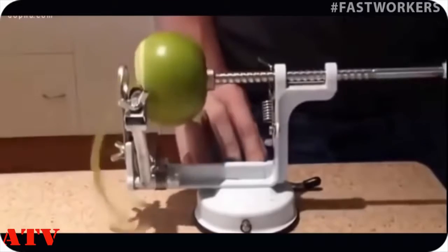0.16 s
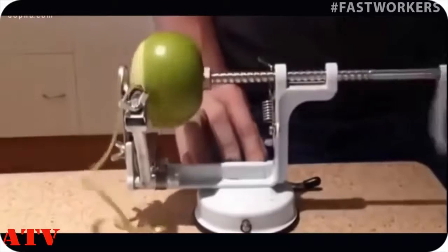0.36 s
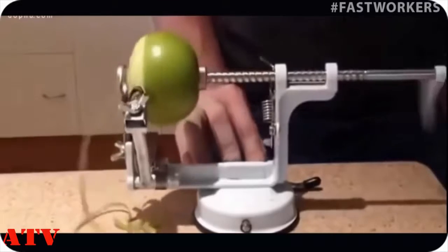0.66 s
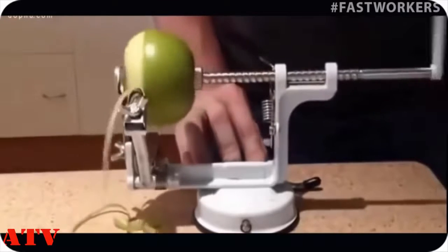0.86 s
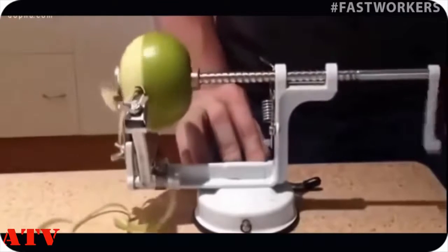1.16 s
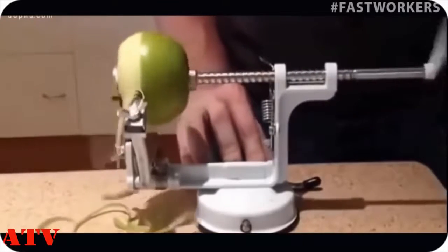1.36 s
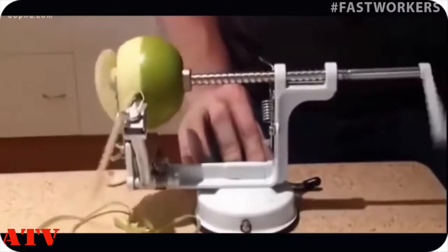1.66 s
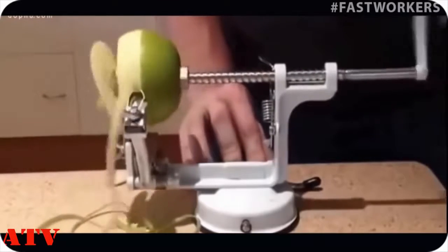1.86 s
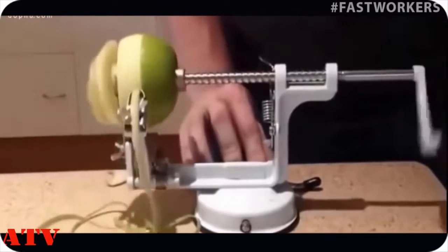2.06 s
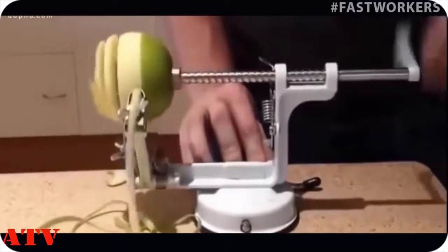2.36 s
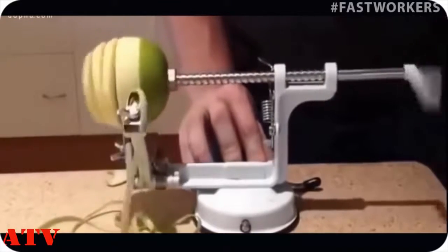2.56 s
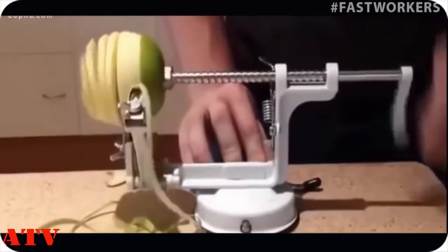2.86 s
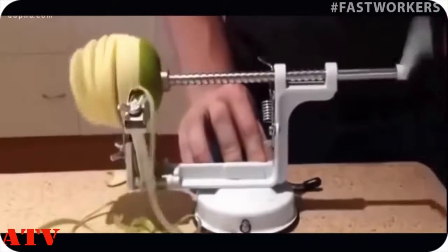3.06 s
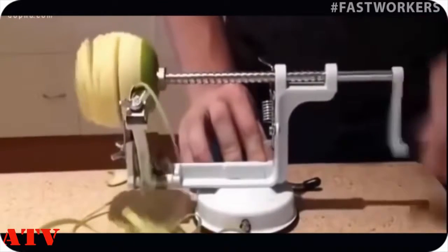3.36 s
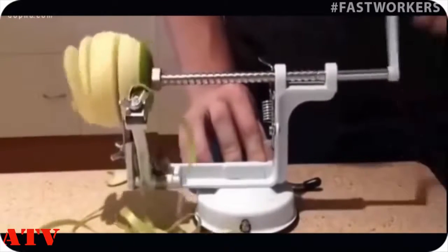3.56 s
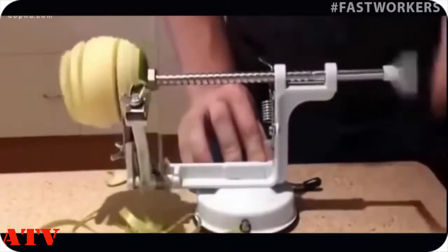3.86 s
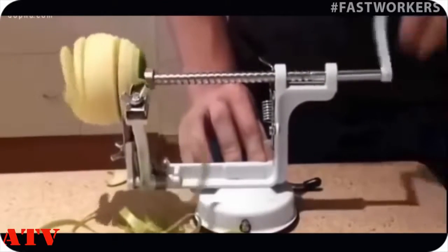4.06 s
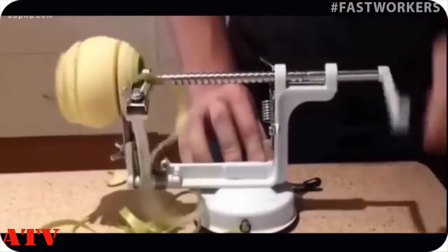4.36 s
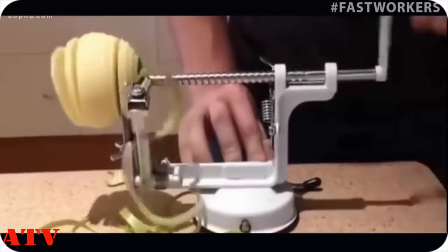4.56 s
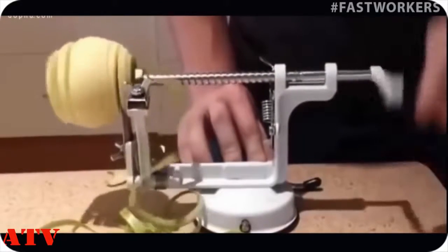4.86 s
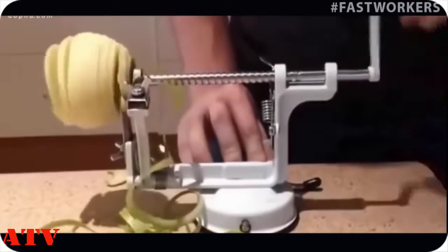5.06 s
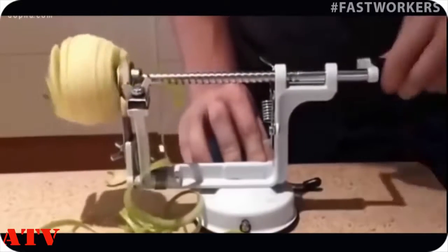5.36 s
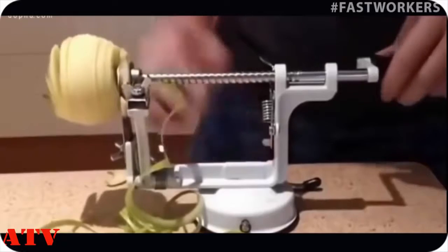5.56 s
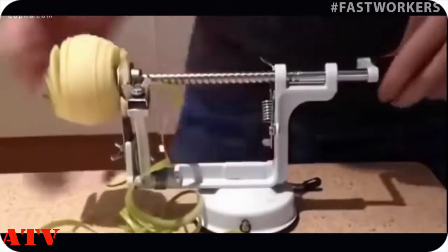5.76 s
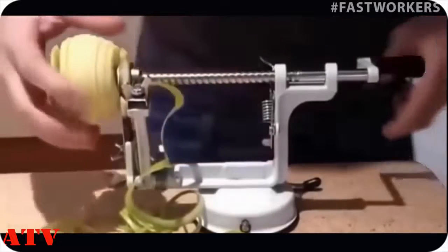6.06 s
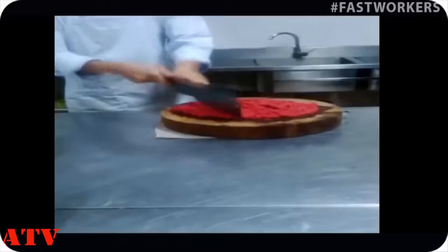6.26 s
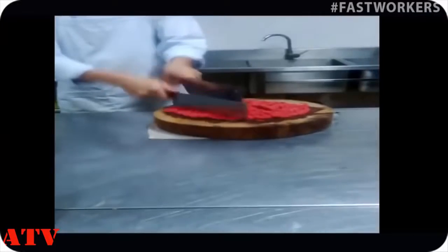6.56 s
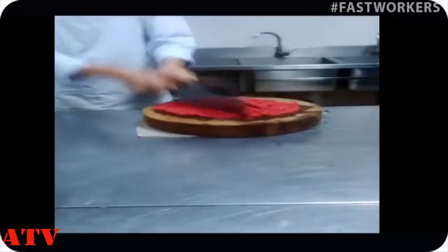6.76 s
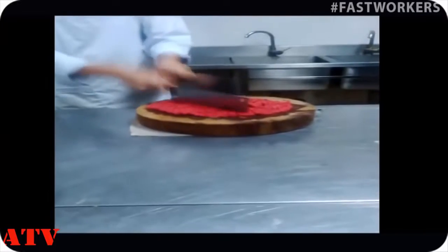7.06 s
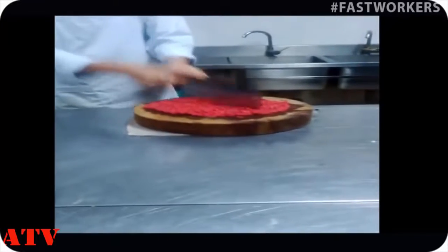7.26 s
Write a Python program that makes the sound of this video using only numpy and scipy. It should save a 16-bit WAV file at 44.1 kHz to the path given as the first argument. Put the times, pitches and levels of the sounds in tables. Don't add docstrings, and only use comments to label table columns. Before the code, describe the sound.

Crisp, juicy apple peeling with creaks and knocks gives way to fast, echoing cleaver blows on a thick board in a hard-walled kitchen.

```python
import sys
import numpy as np
from scipy import signal
from scipy.fft import rfft, irfft, next_fast_len
from scipy.io import wavfile

SR = 44100
rng = np.random.default_rng(int(sys.argv[2]) if len(sys.argv) > 2 else 0)


def ratio(d):
    e = np.asarray(d, float) / 20
    return 10 ** e


def materialize(psi):
    bounded = np.clip(np.atleast_2d(psi).T, -1, 1)
    quanta = np.round(bounded * 32767).astype(np.int16)
    wavfile.write(sys.argv[1], SR, quanta)


N = 327486
CRANK_STOP_S = 5.21
# start_s, crack_peak_db, blade_ring_hz, board_db, push_db
BLOWS = [(6.3505, -54, 3140, -33, -71), (6.4343, -36.5, 3420, -31.5, -62), (6.5217, -44, 2770, -37, -29),
         (6.591, -31.5, 3400, -24.5, -39), (6.6949, -28, 3390, -20, -21), (6.769, -28, 3100, -17, -45),
         (6.872, -20.5, 4440, -10.5, -14), (6.9353, -25.5, 3300, -9.5, -34), (7.042, -23, 4800, -1.5, -3.5),
         (7.1154, -17.5, 4970, -1, -17), (7.213, -20, 5000, -3, -11), (7.2772, -23, 3350, -0.5, -23),
         (7.3843, -16, 4850, -3, -20)]


def peeler():
    # pitch_hz, level_db
    hiss_colour = [(3500, -21.5), (4500, -7.5), (5700, -3), (6300, 1), (6900, 0.5), (7500, 0), (8200, -3.5),
                   (10000, -15.5), (12000, -18)]
    scrape_colour = [(500, -9.5), (750, -4.5), (1000, -6.5), (1350, -2.5), (1800, -4), (2500, -2),
                     (4000, 2.5), (5000, 1.5), (7000, -21)]
    sizzle_colour = [(6500, -19), (9000, 6.5), (10500, 6.5), (12500, 2.5), (14500, -9)]
    bite = drift(6.4)

    hiss = two_ports(grains(9000., 2.3), hiss_colour, diffuse=0.67, left_db=-4.5)
    hiss = hiss * cutting(-32.5, share=1.73, turn_db=0.84, flick_db=1.5)
    hiss = hiss * ratio(2.0 + 1.0 * bite + 0.46 * drift(34.0))

    scrape = two_ports(grains(5000., 3.0), scrape_colour, diffuse=.7, left_db=-1.2)
    scrape = scrape * cutting(-35.5, share=1.62, turn_db=0.3, flick_db=-10.5)
    scrape = scrape * ratio(1.5 + .4 * bite + .6 * drift(15.))

    sizzle = two_ports(grains(12000.0, 3.0), sizzle_colour, diffuse=0.99, left_db=-2.0)
    sizzle = sizzle * cutting(-37, share=1.68, turn_db=0.5, flick_db=-10)
    sizzle = sizzle * ratio(0.34 * bite + 0.29 * drift(30.))

    blade_hz, width_hz = 6790, 480
    sung = resonate(rng.standard_normal((2, N)), blade_hz, width_hz)
    sung = rms_one(resonate(sung, blade_hz, 2 * width_hz))
    song = sung * ratio(np.array([[-2.5], [1.5]]) + 2.6 * drift(14.5))
    song = song * cutting(-40.5, share=0.4, turn_db=-0.5, flick_db=-35) * (np.arange(N) / SR < CRANK_STOP_S)

    tear = rms_one(resonate(rng.standard_normal((2, N)), 8300, 2600))
    tear = tear * ratio(np.array([[-2.0], [1.5]])) * cutting(-49.5, share=8.5, turn_db=-2.5, flick_db=7)
    return hiss + scrape + sizzle + song + tear


def cutting(level_db, share, turn_db, flick_db):
    # start_s, level_db
    bite_curve = [(0, -37), (.3, -36), (1.0, -34.5), (1.17, -36.5), (1.3, -34.5), (1.56, -34), (1.66, -33),
                  (1.97, -30.5), (2.04, -33), (2.12, -30.5), (2.3, -30), (2.55, -32), (2.7, -30.5),
                  (2.9, -31.5), (3.4, -32), (3.65, -31), (4.5, -32), (5.05, -33.5), (5.17, -34.5),
                  (5.6, -43.5), (5.95, -57)]
    # start_s, peak_db
    flicks = [
        (5.268, -35.5),
        (5.47, -45),
    ]
    mean_bite_db = -32
    turns_per_s, downstroke_s = 2.12, 2.167
    rise_s, fall_s = 0.038, 0.048

    t = np.arange(N) / SR
    stroke = np.cos(2 * np.pi * turns_per_s * (t - downstroke_s)) * (t < CRANK_STOP_S)
    steady = ratio(level_db + share * (in_time(bite_curve) - mean_bite_db) + turn_db * stroke)
    flare = 0
    for s, peak_db in flicks:
        width_s = np.where(t < s, rise_s, fall_s)
        flare = flare + ratio(peak_db + flick_db) * np.exp(-.5 * ((t - s) / width_s) ** 2)
    return steady + flare


def snaps():
    # start_s, peak_db
    ticks = [
        (0.9665, -21),
        (1.2185, -24),
        (1.599, -22),
        (1.804, -19),
        (2.1223, -14),
        (2.299, -21),
        (2.311, -23),
        (2.509, -21.5),
        (2.7945, -24),
        (3.4765, -30),
    ]
    s, peak_db = np.transpose(ticks)
    trail = die_away(clicks_at(s, peak_db - 6.5), 0.0018)
    return rms_one(resonate(rng.standard_normal(N), 6900, 3000.)) * trail * ratio(np.array([[-2.5], [1.5]]))


def frame():
    # pitch_hz, width_hz, level_db
    frame_modes = [(123, 32, -12), (226, 19.5, 3), (291, 42, 1.5), (345, 35, -23), (416.4, 20, -2.5),
                   (501, 26, -1), (637, 16.4, -3), (656, 36, -12.5)]
    # start_s, peak_db, brightness_db, thud_hz
    knock_events = [(0.068, -30, -23, 226), (0.25, -30, -3.5, 138), (0.808, -23, -11, 267),
                    (1.219, -15.5, -5, 240), (1.244, -32, -18, 300), (1.276, -21, -13.5, 240),
                    (1.589, -27.5, -1, 210), (1.698, -26.5, -0.5, 130), (1.93, -32, 0.5, 286),
                    (2.16, -33.5, -23, 417), (2.3, -41, -15, 506), (2.458, -30, -29, 345),
                    (2.578, -20.5, -23, 161), (2.739, -27, 0.5, 256), (3.412, -37, 4, 221),
                    (3.57, -21.5, -8, 313), (3.849, -27, -23, 223), (4.078, -30, -37, 214),
                    (4.166, -35, -26, 226), (4.39, -25, -17, 225), (4.515, -27, -29, 226),
                    (4.66, -41, 7, 225), (4.967, -43, 4, 231), (5.16, -27, -21.5, 290)]
    rest_db = -1.5
    load = cutting(-41.5, share=0.86, turn_db=0.5, flick_db=-19)
    load = load * ratio(2.34 * drift(5.9) + rest_db * (np.arange(N) / SR > CRANK_STOP_S))
    s, peak_db, bright_db, thud_hz = np.transpose(knock_events)
    shaking, knocks = 0, 0
    for hz, width_hz, level_db in frame_modes:
        judder = rng.standard_normal(N) * ratio(2.1 * drift(7.3))
        both = judder + 0.81 * rng.standard_normal((2, N)) * np.sqrt(hz / 300)
        shaken = resonate(resonate(both, hz, 1.56 * width_hz), hz, 180.0)
        shaking = shaking + ratio(level_db) * rms_one(shaken)
        near_db = -14 * np.abs(np.log2(thud_hz / hz))
        thud = ring(clicks_at(s, peak_db + near_db - 10.0), hz, 10.0 / hz + 0.083)
        knocks = knocks + resonate(thud, hz, 160.)

    trail = die_away(clicks_at(s, peak_db + bright_db - 14), 0.047)
    rattle = rms_one(resonate(rng.standard_normal((2, N)), 700, 1000.0)) * trail
    for hz in (872, 1055, 1215, 1400):
        bright_clicks = clicks_at(s, peak_db + bright_db - 13.5 + rng.normal(0, 0.73, len(s)))
        knocks = knocks + resonate(ring(bright_clicks, hz, 0.088), hz, 900.)
    return rms_one(shaking) * load + knocks + rattle


def groans():
    # start_s, pitch_hz, level_db, length_s
    groan_events = [(0.131, 215, -41.5, 0.053), (0.183, 199, -46, 0.057), (0.261, 135, -47, 0.069),
                    (0.276, 620, -49.5, 0.044), (0.493, 207, -44, 0.078), (0.589, 226, -46, 0.042),
                    (0.885, 115, -46, 0.058), (0.949, 635, -47, 0.032), (0.975, 339, -45, 0.056),
                    (1.228, 321, -40.5, 0.03), (1.236, 224, -48.5, 0.043), (1.236, 610, -36.5, 0.031),
                    (1.283, 327, -44.5, 0.044), (1.704, 210, -41, 0.041), (1.707, 124, -40.5, 0.029),
                    (1.736, 605, -50.5, 0.05), (1.811, 316, -40.5, 0.041), (2.101, 345, -44.5, 0.061),
                    (2.174, 298, -42, 0.023), (2.188, 415, -40.5, 0.07), (2.302, 511, -45.5, 0.064),
                    (2.322, 151, -40.5, 0.029), (2.374, 236, -37, 0.036), (2.473, 345, -43.5, 0.032),
                    (2.563, 226, -38.5, 0.056), (2.618, 226, -43, 0.062), (2.74, 447, -45, 0.055),
                    (2.743, 245, -50, 0.055), (2.752, 516, -40.5, 0.027), (2.865, 730, -56, 0.041),
                    (3.422, 215.6, -38, 0.084), (3.582, 291, -40, 0.08), (3.637, 530, -46, 0.053),
                    (3.663, 614, -41.5, 0.033), (3.805, 427, -37.5, 0.019), (3.875, 226, -36.5, 0.077),
                    (4.072, 615, -43, 0.037), (4.095, 505, -44.5, 0.074), (4.185, 219, -40, 0.086),
                    (4.374, 430, -41.5, 0.03), (4.397, 231, -33.5, 0.035), (4.528, 226, -35.5, 0.028),
                    (4.531, 592, -51, 0.041), (4.667, 226, -39.5, 0.058), (4.821, 670, -43.5, 0.029),
                    (4.981, 231, -45, 0.029), (5.169, 291, -39, 0.026), (5.181, 226, -49, 0.028)]
    out = np.zeros(N)
    for s, hz, level_db, length_s in groan_events:
        at = np.arange(max(0, round((s - .15) * SR)), round((s + .25) * SR))
        late = at / SR - s
        swell = np.exp(-.5 * (late / (length_s * np.where(late < 0, .3, .45))) ** 2)
        out[at] += ratio(level_db + 4.0) * swell * np.sin(2 * np.pi * hz * late)
    return out


def cleavers():
    # pitch_hz, level_db, time_to_fade_60_db_s
    board_modes = [(820, -16.5, 0.041), (944, -5, 0.032), (954, -2, 0.043), (995, -4.5, 0.035),
                   (1069, -5.5, 0.052), (1136, -5, 0.049), (1210, -15, 0.03), (2003, -5, 0.021),
                   (2130, -9.5, 0.057), (2330, -22, 0.013), (3400, -10, .015)]
    # delay_s, level_db
    wall_echoes = [(.0088, -3), (0.0117, 2), (.0265, -10), (.042, -20), (.055, -15.5), (.071, -27)]
    upper_db = [-2, 5.5, -14, 3.5, 4, 2.5, -0.5, 4.5, -3, -8, -4, -1.5, -2]
    upper_hz, off_hand_nearer_s = 1700, .0006

    fade_db = fade_in_db()
    s, crack_db, blade_hz, board_db, push_db = np.transpose(BLOWS)
    s = s + .0012
    off_hand = np.arange(len(s)) % 2
    starts = (s * SR).astype(int)
    lift_db = np.minimum(-fade_db[starts], 34)

    t = np.arange(800) / SR
    crack = np.zeros(N)
    snap_db = board_db - crack_db - 5 * off_hand
    for at, db, weight_db, hz in zip(starts, crack_db + lift_db, snap_db, blade_hz):
        snap = ratio(weight_db + 5.5) * np.sin(2 * np.pi * 2000 * t) * np.exp(-t / .0003)
        spit = resonate(resonate(rng.standard_normal(len(t)), 3000, 3600), 3000, 7200)
        spit = spit * np.exp(-t / .0025) * ratio(8)
        blade = ratio(6) * np.sin(2 * np.pi * hz * t) * np.exp(-t / .002)
        crack[at:at + len(t)] += ratio(db) * (snap + spit + blade)
    crack = signal.sosfilt(signal.butter(2, 7800, fs=SR, output="sos"), crack)
    push = ring(clicks_at(s - .0005, push_db + lift_db + 0.5), 225, 0.012)

    strength_db = rng.normal(0, 1.5, (len(s), len(board_modes)))
    struck = s - off_hand_nearer_s * off_hand
    knock = 0
    for k, (hz, db, t60) in enumerate(board_modes):
        hit_db = board_db + lift_db + db + 3.5 + strength_db[:, k] + np.array(upper_db) * (hz > upper_hz)
        knock = knock + ring(clicks_at(struck, hit_db), hz, t60)

    direct = ratio(-17.5) * knock + ratio(-11.0) * resonate(knock, 2220, 500.)
    soft = signal.sosfilt(signal.butter(4, 2700., fs=SR, output="sos"), resonate(knock, 1550, 1250.0))
    echoed = sum(ratio(db - 7.0) * np.roll(soft, round(lag * SR)) for lag, db in wall_echoes)
    lasting = knock + ratio(2.5) * resonate(knock, 2130, 300.)
    tail = ratio(-12.5) * hard_room(lasting + ratio(-21.0) * crack)
    return ratio(fade_db) * (crack + push + direct + echoed + tail)


def thin_high_tones():
    # pitch_hz, width_hz, level_db
    tone_bands = [(11600, 140, -50), (11850, 110, -45.5), (12250, 90, -46), (12700, 100, -47),
                  (13250, 90, -51), (13900, 90, -45), (14230, 90, -46)]
    lead_s, length_s, off_hand_db = 0.015, 0.016, -16
    t, out = np.arange(N - round(1.1 * SR), N) / SR, np.zeros((2, N))
    for hz, width_hz, level_db in tone_bands:
        swell = 0
        for k, row in enumerate(BLOWS):
            strength = ratio(rng.normal(0, 3) + off_hand_db * (k % 2))
            swell = swell + strength * np.exp(-.5 * ((t - row[0] + lead_s) / length_s) ** 2)
        sung = resonate(rng.standard_normal(len(t)) + 1.3 * rng.standard_normal((2, len(t))), hz, width_hz)
        out[:, -len(t):] += ratio(level_db) * rms_one(resonate(sung, hz, 3 * width_hz)) * swell
    return out * ratio(fade_in_db())


def sucks():
    # start_s, peak_db, pitch_hz
    pulls = [(6.385, -30, 5000), (6.657, -24, 3430), (6.852, -15, 6570), (6.887, -10, 3500),
             (7.009, -15, 6430), (7.0756, -4, 5130), (7.0948, -5, 3400), (7.192, -6.5, 5060),
             (7.2594, -35, 3400), (7.3586, -5.5, 3550), (7.3763, -9, 5060)]
    out, t = np.zeros(N + SR), np.arange(1200) / SR
    for s, peak_db, hz in pulls:
        smack = rms_one(resonate(rng.standard_normal(len(t)), hz, 3600.0))
        at = round(s * SR)
        out[at:at + len(t)] += ratio(peak_db - 20.0) * smack * np.minimum(t / 0.0022, 1) * np.exp(-t / 0.028)
    return out[:N]


def squeaks():
    # start_s, level_db, pitch_hz
    squeezes = [(6.41, -51, 5000), (6.605, -46, 7500), (6.851, -32, 6720), (6.967, -29.5, 3300),
                (7.012, -33, 6500), (7.093, -26, 4200), (7.108, -30, 6200), (7.134, -33, 4470),
                (7.2, -27.5, 5080), (7.364, -24.5, 3420), (7.377, -30.5, 5450)]
    length_s, width_hz = .005, 250
    out, late = np.zeros(N + SR), np.arange(-700, 700) / SR
    for s, level_db, hz in squeezes:
        whistle = resonate(rng.standard_normal(len(late)), hz, width_hz)
        whistle = rms_one(resonate(whistle, hz, 2 * width_hz))
        at = round((s + late[0]) * SR)
        out[at:at + len(late)] += ratio(level_db) * whistle * np.exp(-.5 * (late / length_s) ** 2)
    return out[:N]


def second_kitchen():
    # pitch_hz, level_db_per_hz
    rumble_colour = [(12, -37), (20, 5), (128, -1.5), (165, -4.5), (262, -2.5), (398, -11), (475, -3),
                     (577, -9), (700, -5.5), (910, -18), (1540, -120)]
    squelch_colour = [(900, -7.5), (1600, 14), (2600, 8.5), (4000, 4.5), (6000, 2.5), (8500, -5),
                      (11000, -6.5), (13000, -17), (14000, -9.5), (14700, -13)]
    hand = ratio(-14 * (np.arange(len(BLOWS)) % 2))
    jolts = sum(g * bump(row[0] + .002, rise_s=.001, fall_s=0.007) for g, row in zip(hand, BLOWS))
    sinks = sum(bump(row[0], rise_s=0.0065, fall_s=0.016) for row in BLOWS)
    wide = rng.standard_normal((2, N))

    rumble = colour(rng.standard_normal(N) + 0.04 * wide, rumble_colour)
    rumble = rumble * ratio(-23.5 + 2.45 * drift(18.6)) * (1 + ratio(6) * jolts)

    flicker_db = 1.5 * drift(30)
    squelch = colour(rms_one(grains(9000., 2.8)) + 0.44 * wide[::-1], squelch_colour)
    squelch = squelch * ratio(-34 + 6.0 + flicker_db) * (1 + ratio(-3) * sinks)

    fade_db = fade_in_db()
    lead_db = 5.5 * np.clip(-fade_db / 30, 0, 1)
    return (rumble * ratio(lead_db) + squelch) * ratio(fade_db)


def hard_room(x):
    t60_s, onset_s, wall_cut_hz = .7, 0.021, 3700
    t = np.arange(SR) / SR
    tails = rng.standard_normal((2, SR)) * ratio(-60 * t / t60_s) * (1 - np.exp(-(t / onset_s) ** 3))
    tails = .03 * signal.lfilter(*signal.butter(1, wall_cut_hz, fs=SR), tails)
    size = next_fast_len(N + SR)
    shared, apart = irfft(rfft(tails, size) * rfft(x, size), size)[:, :N]
    return shared + ratio(-20.0) * apart * [[1], [-1]]


def first_kitchen_air():
    # pitch_hz, level_db_per_hz
    air_colour = [(20, -28), (65, -7), (110, -8.5), (145, -1), (200, -14.5), (360, -13.5), (760, -21),
                  (1500, -26), (3500, -30.5), (7000, -29.5), (11000, -34.5), (14700, -34.5)]
    # pitch_hz, left_right_likeness (1 = same)
    air_alike = [(60, 0.11), (180, 0.66), (540, -0.25), (1610, 0.087), (4810, 0.034), (14400, 0.13)]
    # pitch_hz, level_db
    hum = [(74, -55.5), (97, -62), (147, -55), (221, -66), (366, -67), (489, -72)]
    # partial_number, start_s, end_s, level_db
    hum_swells = [
        (0, 2.9, 6.4, 6),
        (2, 4.3, 5.05, 19),
        (2, 5.7, 6.4, 13),
    ]
    hum_low_db, ramp_s = (-5, 0, -12, 0, 0, 0), .12

    mid, side = rng.standard_normal((2, N))
    alike = [(hz, 10 * np.log10((1 - c) / (1 + c) + 1e-3)) for hz, c in np.clip(air_alike, -.9, None)]
    size = next_fast_len(N)
    side = irfft(rfft(side, size) * ratio(at_hz(alike, np.fft.rfftfreq(size, 1 / SR))), size)[:N]
    air = colour(np.array([mid + side, mid - side]), air_colour) * ratio(-52 + 3.0)

    t = np.arange(N) / SR
    for k, (hz, level_db) in enumerate(hum):
        wobble = .6 * drift(1.5)
        swell_db = hum_low_db[k]
        for which, start_s, end_s, db in hum_swells:
            if which == k:
                swell_db = swell_db + db * np.clip(np.minimum(t - start_s, end_s - t) / ramp_s, 0, 1)
        gain = np.sqrt(2) * ratio(level_db + 1.55 * drift(2.1) + swell_db)
        air = air + gain * np.sin(2 * np.pi * hz * t + wobble)
    return air


def fade_in_db():
    t = np.arange(N) / SR
    grown = (t - 6.277) / 0.86
    opened = (t - 6.342) / .034
    return 20 * np.log10(np.clip(grown, 1e-5, 1) ** 1.91 * np.clip(opened, 1e-3, 1) ** 2)


def bump(at_s, rise_s, fall_s):
    start = round(6.3 * SR)
    late = np.arange(start, N) / SR - at_s
    return np.pad(np.exp(np.where(late < 0, late / rise_s, -late / fall_s)), (start, 0))


def in_time(rows):
    s, value = np.transpose(rows)
    return np.interp(np.arange(N) / SR, s, value)


def rms_one(x):
    return x / np.sqrt(np.mean(x ** 2) + 1e-20)


def drift(rate):
    r = np.exp(-80 * np.pi * rate / SR)
    slow = signal.lfilter([1], [1, -2 * r, r * r], rng.standard_normal(N // 40 + 2002))[2000:]
    return np.interp(np.arange(N) / 40, np.arange(len(slow)), rms_one(slow))


def at_hz(points, hz):
    return np.interp(np.log(hz + 1), np.log(np.array(points)[:, 0]), np.array(points)[:, 1])


def colour(x, spectrum):
    size = next_fast_len(N)
    gain = ratio(at_hz(spectrum, np.fft.rfftfreq(size, 1 / SR)))
    return rms_one(irfft(rfft(x, size) * gain, size)[..., :N])


def resonate(x, hz, width_hz):
    r = np.exp(-np.pi * width_hz / SR)
    feedback = [1, -2 * r * np.cos(2 * np.pi * hz / SR), r * r]
    return signal.lfilter([(1 - r * r) / 2, 0, (r * r - 1) / 2], feedback, x)


def ring(clicks, hz, t60):
    r, w = ratio(-60 / (t60 * SR)), 2 * np.pi * hz / SR
    return signal.lfilter([0, np.sin(w)], [1, -2 * r * np.cos(w), r * r], clicks + 1e-18)


def die_away(clicks, fall_s):
    return signal.lfilter([1], [1, -np.exp(-1 / (fall_s * SR))], clicks)


def clicks_at(seconds, db):
    out = np.zeros(N + SR)
    np.add.at(out, np.round(np.asarray(seconds) * SR).astype(int), ratio(np.asarray(db)))
    return out[:N]


def grains(per_s, spread_db):
    sizes = ratio(spread_db * np.minimum(rng.exponential(1, N), 5)) * rng.choice([-1, 1], N)
    return sizes * (rng.random(N) < per_s / SR)


def two_ports(direct, spectrum, diffuse, left_db):
    pair = np.array([np.roll(direct, 4), direct])
    share = np.clip(diffuse, 0, 1)
    mixed = np.sqrt(1 - share) * rms_one(pair) + np.sqrt(share) * rng.standard_normal((2, N))
    return colour(mixed, spectrum) * ratio(np.array([[left_db / 2], [-left_db / 2]]))


def scene():
    # start_s, level_db
    fade_out = [
        (0, 3.5),
        (6.24, 0),
        (6.256, -3.5),
        (6.285, -88),
    ]
    first = peeler() + snaps() + frame() + groans() + first_kitchen_air()
    second = cleavers() + second_kitchen() + sucks() + thin_high_tones() + squeaks()
    return first * ratio(in_time(fade_out)) + second


def band_limit(x):
    return signal.sosfilt(signal.butter(12, 14980, fs=SR, output="sos"), x)


def record(dry):
    rounded = dry / (1 + (dry / .92) ** 4) ** .25
    return band_limit(rounded)


dry = scene()
out = record(dry)
materialize(out)
```